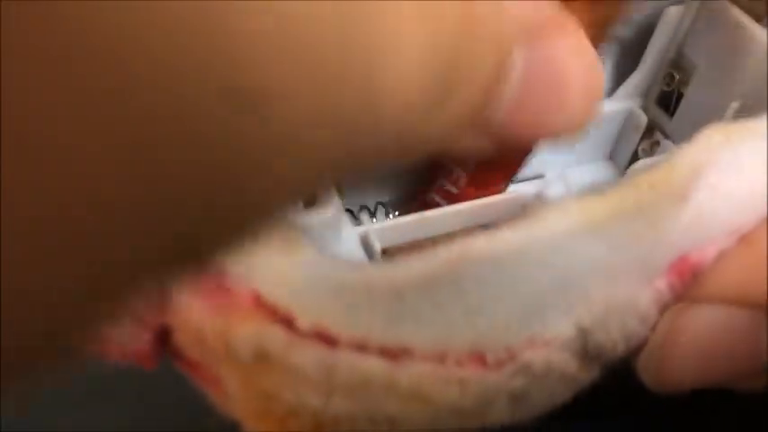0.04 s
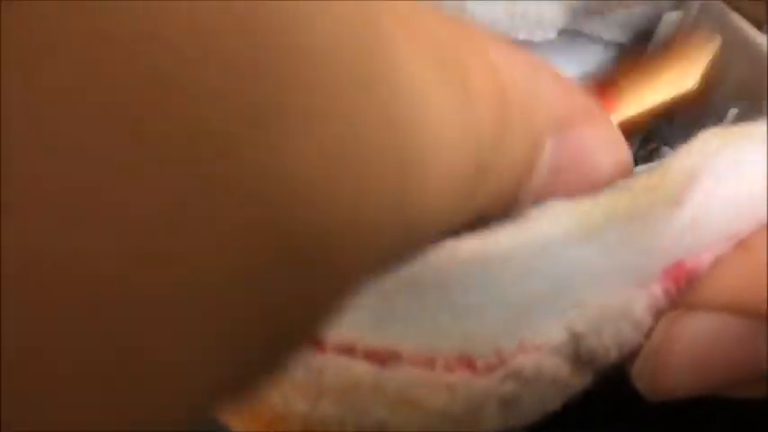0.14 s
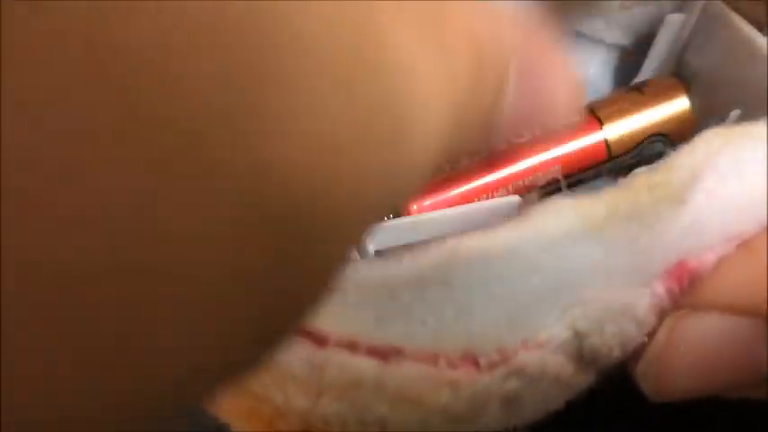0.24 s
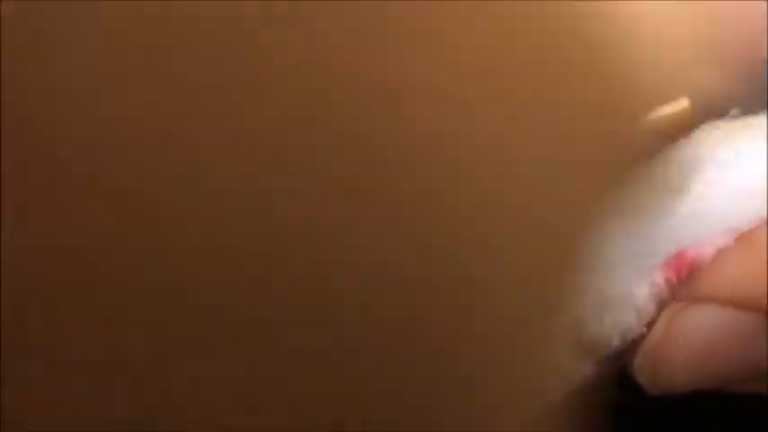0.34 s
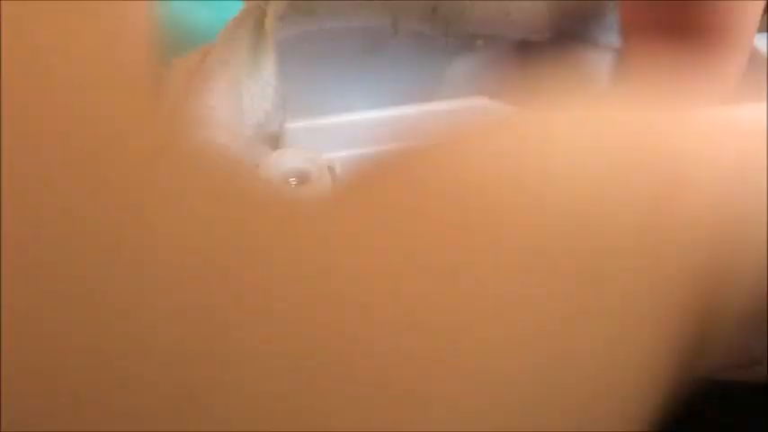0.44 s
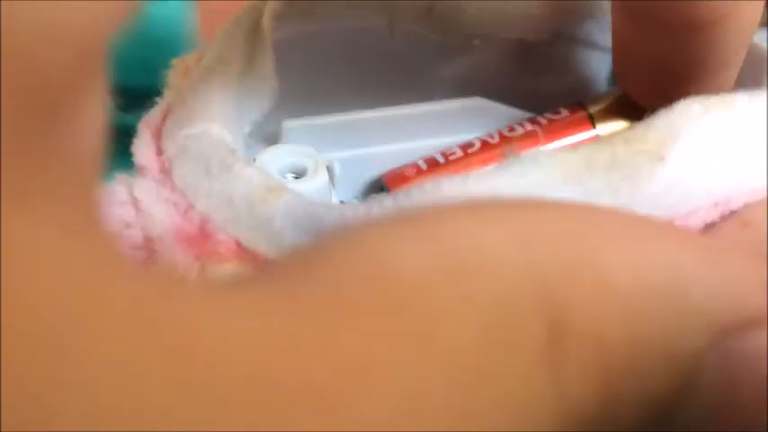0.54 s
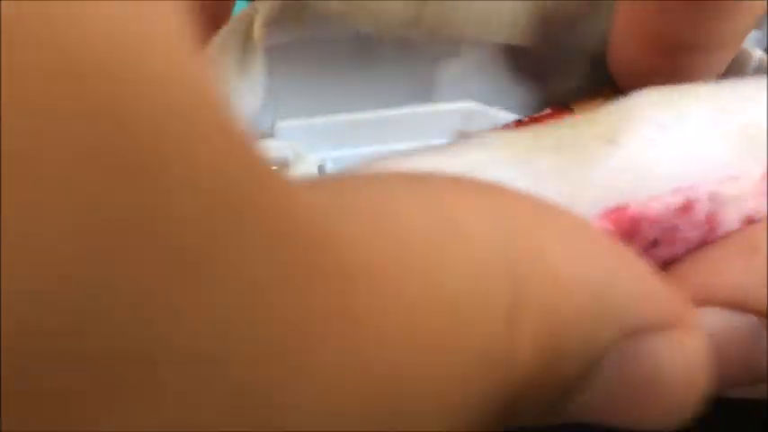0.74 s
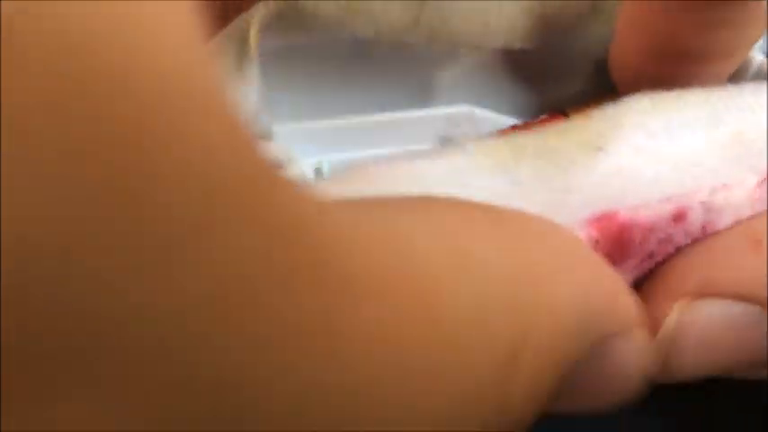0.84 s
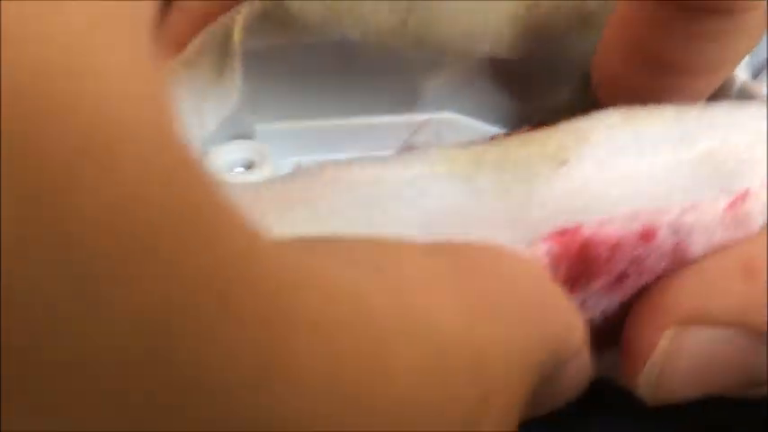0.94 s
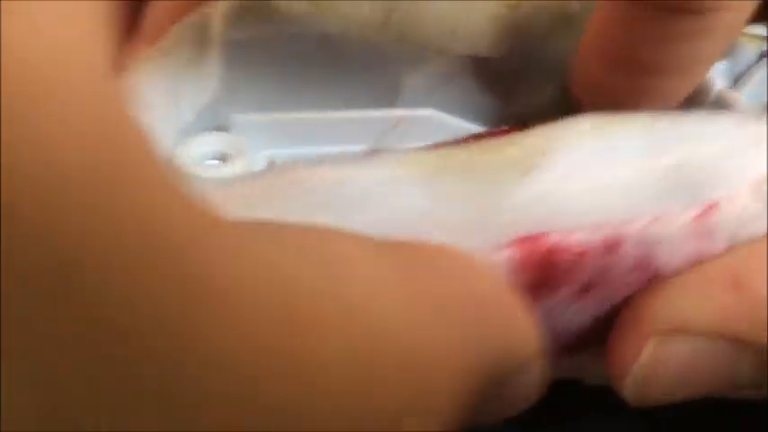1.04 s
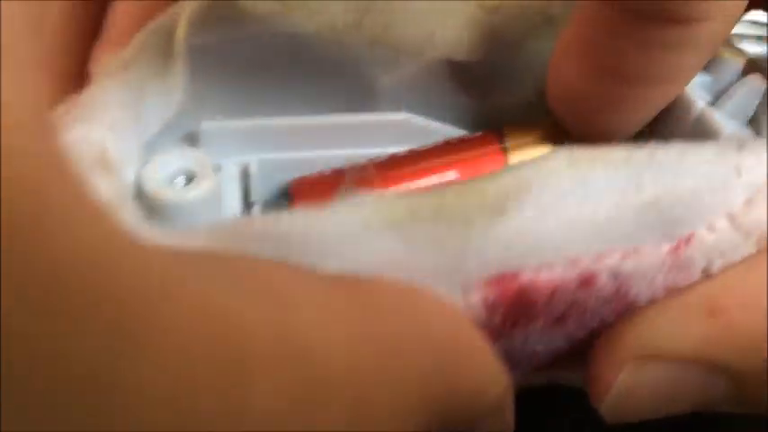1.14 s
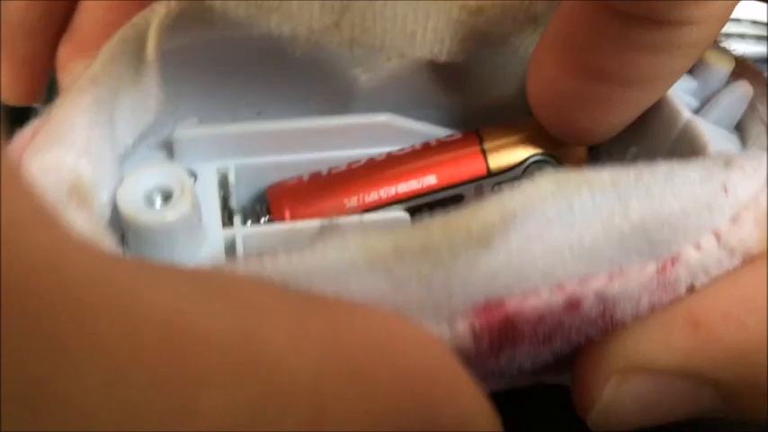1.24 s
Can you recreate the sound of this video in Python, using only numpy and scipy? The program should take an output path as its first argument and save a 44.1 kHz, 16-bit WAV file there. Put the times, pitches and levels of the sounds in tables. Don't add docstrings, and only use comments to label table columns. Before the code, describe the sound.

A small battery ticks against thin plastic walls, snaps home with a loud bright clack and brief rattle, then quiet soft rubbing and one lighter tick; close microphone in a quiet, faintly humming room.

```python
import sys
import numpy as np
from scipy import signal
from scipy.fft import rfft, irfft, next_fast_len
from scipy.io import wavfile
from scipy.ndimage import uniform_filter1d, map_coordinates

SR = 44100
rng = np.random.default_rng(int(sys.argv[2]) if len(sys.argv) > 2 else 0)


def convert_level_to_amplitude(level_db):
    exponent = np.asarray(level_db, float) / 20
    return 10 ** exponent


def inscribe(sig):
    pcm = np.round(np.clip(np.atleast_2d(sig).T, -1, 1) * 32767)
    wavfile.write(sys.argv[1], SR, pcm.astype(np.int16))


N = 57330
TIME = np.arange(N) / SR


def unit(x):
    return x / np.sqrt(np.mean(x ** 2) + 1e-20)


def along(points, hz):
    point_hz, value = np.transpose(points)
    return np.interp(np.log(hz + 1), np.log(point_hz + 1), value)


def level_curve(points):
    s, db = np.transpose(points)
    return np.interp(TIME, s, db)


def wobble(rate):
    return map_coordinates(rng.standard_normal(400), [np.arange(N) * min(rate, 300) / SR])


def filtered(x, response):
    size = next_fast_len(len(x) + 8192)
    spectrum = rfft(x, size) * response(np.fft.rfftfreq(size, 1 / SR))
    return irfft(spectrum, size)[:len(x)]


def peak(f, hz, width):
    return 1j * f * width / (hz * hz - f * f + 1j * f * width)


# (frequency [Hz], density [dB per Hz])
HISS_COLOUR = [(120, -34), (200, 1.5), (366, -11), (558, -9), (1140, -18.5), (2610, -19.5), (7010, -26.5),
               (16000, -31.5)]
# (frequency [Hz], density [dB per Hz])
RUMBLE_COLOUR = [(15, -56.5), (25, -27), (81, -1.5), (113, -9), (166, -3), (190, -11), (400, -26.5),
                 (520, -63), (880, -120)]


def room():
    hiss = unit(filtered(rng.standard_normal(N), lambda f: convert_level_to_amplitude(along(HISS_COLOUR, f))))
    rumble = unit(filtered(rng.standard_normal(N), lambda f: convert_level_to_amplitude(along(RUMBLE_COLOUR, f))))
    hiss_gain = convert_level_to_amplitude(-64.5 + 0.72 * wobble(24))
    rumble_gain = convert_level_to_amplitude(-60.5 + 1.5 * wobble(3))
    return hiss_gain * hiss + rumble_gain * rumble


# (frequency [Hz], t60 [s])
WALL_DECAY = [(200, 0.64), (1400, 0.19), (4000, 0.28), (10000, 0.056)]


def walls(x):
    delay_s = 0.0055
    hz, t, z = signal.stft(rng.standard_normal(SR // 2), SR, nperseg=256)
    decay = convert_level_to_amplitude(-60 * t / along(WALL_DECAY, hz)[:, None])
    tail = signal.istft(z * decay, SR, nperseg=256)[1]
    late = np.pad(x, (round(delay_s * SR), 0))
    return signal.fftconvolve(late, tail / np.linalg.norm(tail))[:N]


def patchy(x):
    patch_db = 1.6
    z = signal.stft(x, nperseg=256)[2]
    field = uniform_filter1d(rng.standard_normal(z.shape), size=20, axis=0)
    field = uniform_filter1d(field, size=5, axis=1)
    return signal.istft(z * convert_level_to_amplitude(patch_db * unit(field)), nperseg=256)[1][:N]


# (time [s], level [dB])
RUB_EFFORT = [ (0, -59), (.085, -84), (.105, -61), (0.199, -63.5), (0.37, -74), (.45, -70.5), (0.49, -58.5),
              (0.529, -80), (0.578, -69), (.6, -91), (.73, -68.5), (0.771, -65.5), (0.819, -71),
              (0.866, -60.5), (0.97, -67), (1.026, -48), (1.11, -62.5), (1.134, -51), (1.3, -56)]
# (frequency [Hz], density [dB per Hz])
PLUSH_COLOUR = [(180, -58.5), (300, -24.5), (634, -10), (701, -20.5), (749, -7), (994, -6.5), (1460, -8.5),
                (4910, -4.5), (16000, -24)]


def rubbing():
    grains_per_s, grain_spread_db, grain_share = 2500, 2.5, 0.38
    draw = rng.random((2, N))
    caught = draw[0] < grains_per_s / SR
    strength = convert_level_to_amplitude(-grain_spread_db * np.log(draw[1] + 1e-9))
    grains = caught * strength * rng.standard_normal(N)
    hiss = rng.standard_normal(N)
    raw = np.sqrt(grain_share) * unit(grains) + np.sqrt(1 - grain_share) * hiss
    sound = unit(filtered(patchy(raw), lambda f: convert_level_to_amplitude(along(PLUSH_COLOUR, f))))
    return convert_level_to_amplitude(level_curve(RUB_EFFORT) + 1.3 * wobble(31)) * sound


# (time [s], level [dB], pitch [Hz], t60 [s])
PRESSES = [(0.066, -38, 196, 0.04), (.14, -42, 212, 0.15), (.125, -40, 70.6, 0.08),
           (0.19, -36.5, 64.9, 0.057), (0.238, -34.5, 130.6, 0.1), (0.279, -34.5, 168.5, 0.12),
           (0.288, -37.5, 73, 0.12), (0.339, -29.5, 135, 0.028), (0.477, -33.5, 99.2, 0.038),
           (0.576, -38.5, 66, 0.18), (0.688, -54, 137.3, 0.05), (0.873, -49, 82, 0.306),
           (0.521, -61, 171.8, 0.21), (0.899, -52, 158.3, 0.22), (1.006, -39, 80.5, 0.06),
           (.205, -42, 380, 0.046), (1.033, -33.5, 86.5, 0.1), (1.236, -67, 99, 0.039)]


def thumps():
    sag, sag_s = 0.99, 0.0043
    out = np.zeros(N)
    for s, db, hz, t60 in PRESSES:
        u = np.maximum(TIME - s, 0)
        envelope = convert_level_to_amplitude(db - 60 * u / t60) * (1 - np.exp(-u * hz * 2.2))
        cycles = hz * (u + sag * sag_s * (1 - np.exp(-u / sag_s)))
        out += envelope * np.sin(2 * np.pi * cycles)
    return out


# (frequency [Hz], width [Hz], level [dB])
CASE_MODES = [(380, 220, 0), (620, 160, 0.5), (876, 290, -5.5), (1790, 1100, -7), (2700, 1140, -7.5),
              (3210, 1300, -8.5), (4627, 240, -7.5), (5540, 230, -8.5), (6800, 520, -10.5),
              (7685, 980, -11.5), (11000, 5900, -14.5), (13700, 1300, -15.5)]


def case(f, chance):
    scatter_db, detune = 3, 0.04
    total = 0
    for k, (hz, width, db) in enumerate(CASE_MODES):
        gain = (-1) ** k * convert_level_to_amplitude(db + scatter_db * chance[0, k])
        total = total + gain * peak(f, hz * (1 + detune * chance[1, k]), width)
    return total


# (time [s], level [dB])
RATTLE_LEVEL = [
    (0, -59.5),
    (.05, -60.5),
    (.13, -59),
    (0.221, -81),
    (0.249, -39.5),
    (0.269, -53.5),
    (.282, -25),
    (0.343, -54),
    (.375, -86),
]


def rattle():
    touches_per_s, spread_db, touch_t60_s = 900, 12, 0.0031
    draw = rng.random((2, N))
    touches = (draw[0] < touches_per_s / SR) * convert_level_to_amplitude(spread_db * draw[1])
    decay = convert_level_to_amplitude(-60 * np.arange(512) / SR / touch_t60_s)
    chatter = signal.fftconvolve(touches, decay)[:N] * rng.standard_normal(N)
    steady = np.zeros((2, len(CASE_MODES)))
    sound = filtered(chatter, lambda f: case(f, steady) * peak(f, 1700, 4000))
    return convert_level_to_amplitude(level_curve(RATTLE_LEVEL)) * unit(sound)


# (time [s], frequency [Hz], level [dB], t60 [s])
RINGING_MODES = [(.0645, 1980, -26.5, 0.0059), (.0655, 4300, -44, 0.015), (.0645, 5800, -34.5, 0.018),
                 (.0693, 1870, -44, 0.012), (.0715, 830, -37, 0.021), (0.073, 387, -37, 0.04),
                 (.1785, 945, -13, 0.012), (.1775, 620, -22, 0.01), (.1765, 5480, -31.5, 0.0096),
                 (.2100, 1790, -34, 0.01), (.2125, 775, -25, 0.015), (.2085, 4270, -39, .015),
                 (.2405, 2640, -14.5, .015), (.2410, 1370, -17.5, 0.018), (.2575, 4320, -35.5, 0.017),
                 (.2555, 5600, -43, 0.012), (.2733, 2576, -6, 0.011), (.2734, 1934, -7.5, .014),
                 (.2735, 3276, -8, 0.013), (.2905, 4232, -28, 0.019), (.2905, 1515, -20, 0.015),
                 (0.2945, 1700, -11, 0.0042), (.2945, 4200, -29, 0.015), (.2945, 5810, -27, .01),
                 (.3135, 1500, -30.5, 0.016), (.3195, 870, -30, 0.013), (.3270, 6340, -44, 0.0052),
                 (.3270, 4300, -39, 0.013), (.3290, 1630, -53, 0.055), (.3310, 5150, -46, 0.031),
                 (.3460, 852, -43, 0.016), (.3505, 706, -38, 0.012), (.3580, 6300, -54, .01),
                 (.4700, 844, -49, 0.08), (.4710, 527, -50, 0.078), (.4710, 1750, -54.5, 0.025),
                 (.4960, 690, -51, 0.025), (.5275, 2540, -53, 0.013), (.5285, 1824, -49.5, .015),
                 (.5690, 810, -58.5, 0.032), (.5780, 1685, -62.5, 0.2), (.5750, 3000, -61, 0.065),
                 (.5770, 5550, -56, 0.03), (.6892, 1865, -37, 0.0066), (.6895, 4910, -33, 0.0044),
                 (0.6903, 1280, -42, 0.013), (.7850, 550, -56, 0.083), (1.0262, 4335, -25, 0.0094),
                 (1.0265, 3190, -31.5, 0.0064), (1.0279, 1560, -33.5, 0.0072)]


def rings():
    rise_cycles = 0.32
    s, hz, db, t60 = np.transpose(RINGING_MODES)[:, :, None]
    u = np.maximum(TIME - s, 0)
    envelope = convert_level_to_amplitude(db - 60 * u / t60) * (1 - np.exp(-u * hz / rise_cycles))
    return np.sum(envelope * np.sin(2 * np.pi * hz * u), axis=0)


def crack_of(t, length, hz, crack_db):
    edge_s, t60_s, fade_db, split_hz = 0.00026, 0.019, 7, 4000
    treble_db, treble_faster = 8, 2.2
    soft_hz, soft_tilt = 8000, 0.16
    noise = rng.standard_normal(len(t))
    chance = rng.standard_normal((2, len(CASE_MODES)))
    decay_db = -60 * np.maximum(t - length, 0) / t60_s - fade_db * np.minimum(t / length, 1)
    shape = (1 - np.exp(-t / edge_s)) * convert_level_to_amplitude(decay_db)
    treble = filtered(noise, lambda f: f * f / (f * f + split_hz ** 2))
    early = convert_level_to_amplitude(treble_db) * unit(shape ** treble_faster) * np.sqrt(np.mean(shape ** 2))

    def body(f):
        dulling = convert_level_to_amplitude(soft_tilt * crack_db * np.log2(1 + f / soft_hz))
        return case(f, chance) * peak(f, hz, 2.6 * hz) * dulling

    return filtered(shape * (noise - treble) + early * treble, body)


def mode_of(t, length, hz):
    rough = 0.6 * np.sqrt(SR / hz) * rng.standard_normal(len(t))
    push = np.clip(1 - t / length, 0, 1) ** 0.91
    drive = (np.cos(2 * np.pi * hz * t) + rough) * push
    return filtered(drive, lambda f: peak(f, hz, hz / 3) ** 2)


def contacts(rows):
    out = np.zeros(N + SR)
    t = np.arange(2048) / SR
    for s, crack_db, hz, mode_db, length in rows:
        crack = crack_of(t, length, hz, crack_db)
        mode = mode_of(t, length, hz)
        hit = convert_level_to_amplitude(crack_db) * crack / abs(crack).max() + convert_level_to_amplitude(mode_db) * mode / abs(mode).max()
        out[max(round(s * SR), 0):][:len(t)] += hit
    return out[:N]


# (time [s], crack level [dB], loudest mode [Hz], mode level [dB], contact length [s])
HANDLING = [(.0015, -44, 733, -44.5, 0.0011), (.0093, -48.5, 2000, -36, 0.00066),
            (.0183, -67, 958, -41, 0.0014), (.0232, -62, 1440, -47, .001), (.0275, -49, 1360, -51, .002),
            (.0642, -25.5, 1958, -38, 0.0017), (.0660, -37.5, 750, -29.5, .0015),
            (.0695, -29, 450, -50, 0.0024), (.1310, -46.5, 1900, -49.5, .005),
            (.1415, -49.5, 720, -37.5, 0.0013), (.1762, -35.5, 1760, -24.5, .0025),
            (.1772, -37, 988, -19.5, 0.0025), (.4703, -47, 839, -52, 0.00887),
            (.5272, -52, 4310, -49, 0.0019), (.5675, -49, 2270, -55, 0.0012),
            (.5700, -53, 620, -54.5, 0.011), (.6030, -67, 1710, -59, 0.0017),
            (.6890, -47.5, 7240, -48, 0.0012), (.6905, -59.5, 615, -35.5, 0.0045),
            (.6890, -52, 2347, -46.5, 0.00076), (1.0258, -31.5, 5310, -20.5, 0.0032),
            (1.1255, -40.5, 4870, -37, 0.0019), (1.1495, -66, 4320, -38.5, 0.0028),
            (1.2490, -61.5, 5000, -47.5, 0.0057), (.6470, -59, 1510, -58, 0.0019),
            (.7620, -54.5, 4050, -54.5, 0.0022), (.9200, -53.5, 4250, -55.5, 0.0015),
            (.9820, -47, 3030, -52, 0.0015), (1.1000, -65, 13800, -53.5, .002),
            (1.1660, -66, 7180, -38.5, 0.00205), (1.0200, -38, 3490, -45, 0.0069)]


def handling():
    return contacts(HANDLING)


# (time [s], crack level [dB], loudest mode [Hz], mode level [dB], contact length [s])
BATTERY_HITS = [(.2076, -35.5, 1700, -31, .004), (.2105, -43.5, 970, -29, 0.0034),
                (.2312, -26, 1550, -31, 0.007), (.2400, -16.5, 1894, -15, 0.0052),
                (.2428, -31.5, 880, -21.5, 0.0017), (.2555, -36, 11000, -40.5, 0.0023),
                (.2586, -45, 1380, -26, 0.0016), (.2732, -12, 1917, -4.5, 0.0026),
                (.2736, -7.5, 2995, -16.5, 0.00064), (.2795, -18.5, 2600, -20, 0.0025),
                (.2820, -28, 621.4, -21, 0.0016), (.2853, -28.5, 1650, -14.5, 0.00096),
                (.2735, -24, 5070, -11, 0.0019), (.2942, -22.5, 1731, -28.5, 0.0009),
                (.3040, -39.5, 4260, -30, .003), (.3052, -41, 1920, -38, 0.0025),
                (.3165, -45.5, 4360, -34, .002), (.2330, -43, 700, -33, 0.0027),
                (.3215, -48, 15400, -36.5, 0.0049), (.2405, -39.5, 4460, -21.5, .003),
                (.3310, -57, 620, -36, .002), (.3372, -34.5, 2015, -48, .002),
                (.3390, -45, 643, -37.5, .004), (.3530, -43, 6750, -46.5, 0.0018)]


def snap():
    return contacts(BATTERY_HITS)


def scene():
    hits = snap() + handling() + rings()
    echo = convert_level_to_amplitude(-26) * walls(hits)
    return (hits + echo + rattle() + thumps() + rubbing() + room())[None]


THIN_MOMENTS = [
    .731,
    .965,
    1.18,
    1.221,
]


def thinned(x):
    half_s, kept_share, kept_below_hz, whole_below_hz = 0.007, 0.3, 9000, 900
    kept_db, lost_db = 4, -16
    hz, t, z = signal.stft(x, SR, nperseg=512, noverlap=384)
    for s in THIN_MOMENTS:
        lucky = np.repeat(rng.random(129), 2)[:len(hz)] < kept_share
        kept = (lucky & (hz < kept_below_hz)) | (hz < whole_below_hz)
        gain = convert_level_to_amplitude(np.where(kept, kept_db * (hz > whole_below_hz), lost_db))
        z = z * np.where(abs(t - s) < half_s, gain[:, None], 1)
    return signal.istft(z, SR, nperseg=512, noverlap=384)[1][:N]


def band_limit(x):
    return signal.sosfilt(signal.butter(12, 16960, fs=SR, output="sos"), x)


def record(dry):
    hiss_db, ceiling, knee = -74.5, 0.9, 6
    top_hz, shelf_db = 15950, -22
    x = dry[0] + convert_level_to_amplitude(hiss_db) * rng.standard_normal(N)
    x = thinned(x)
    x = x / (1 + abs(x / ceiling) ** knee) ** (1 / knee)
    mix = filtered(x, lambda f: np.where(f < top_hz, 1, convert_level_to_amplitude(shelf_db)))[None]
    return band_limit(mix)


dry = scene()
out = record(dry)
inscribe(out)
```